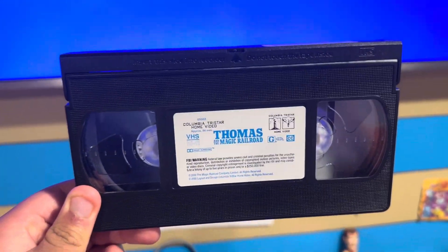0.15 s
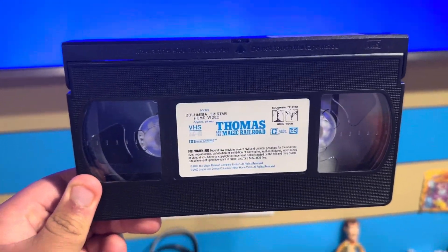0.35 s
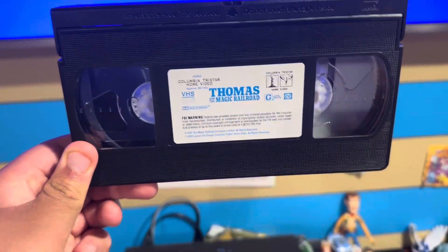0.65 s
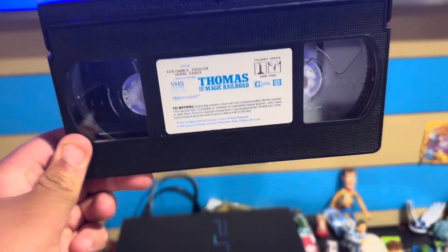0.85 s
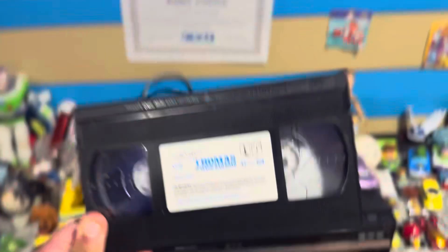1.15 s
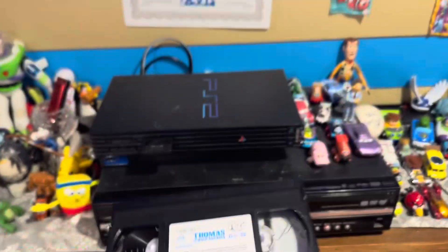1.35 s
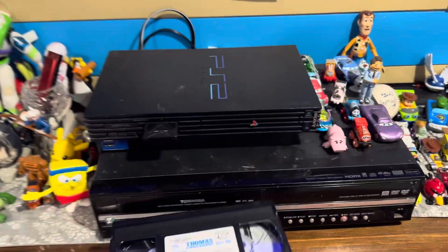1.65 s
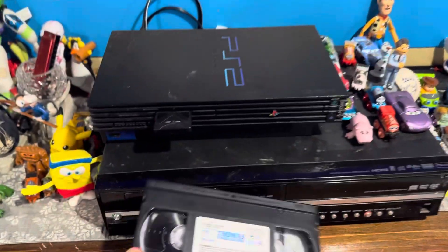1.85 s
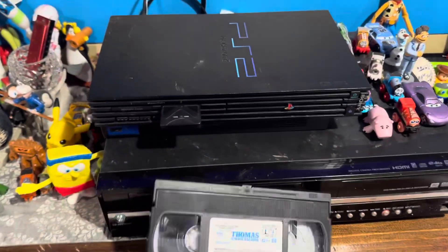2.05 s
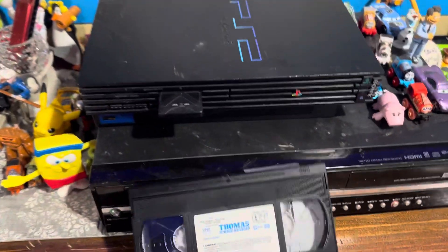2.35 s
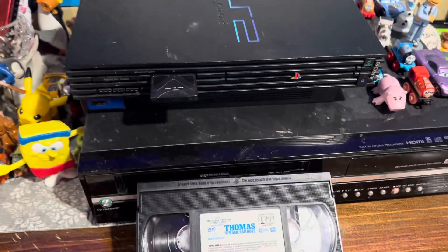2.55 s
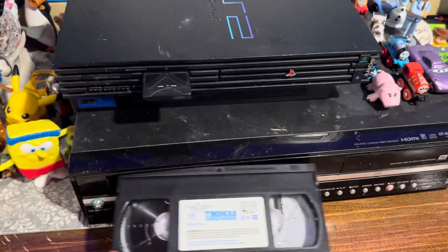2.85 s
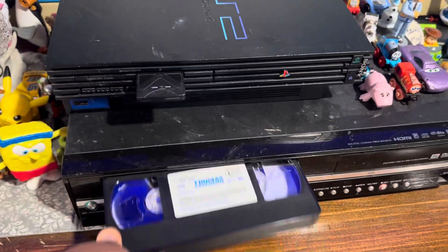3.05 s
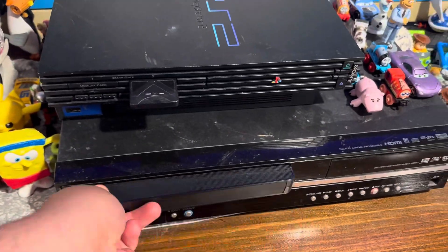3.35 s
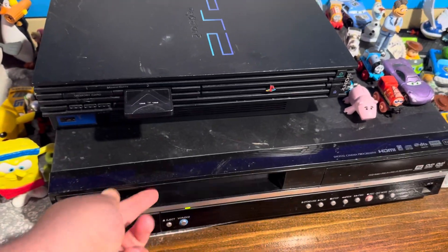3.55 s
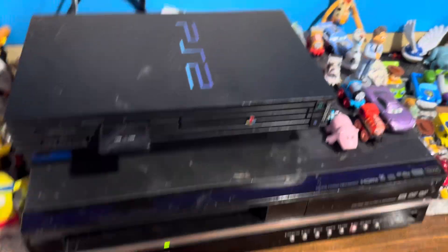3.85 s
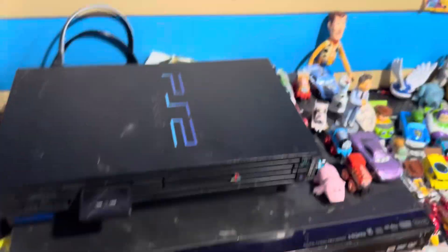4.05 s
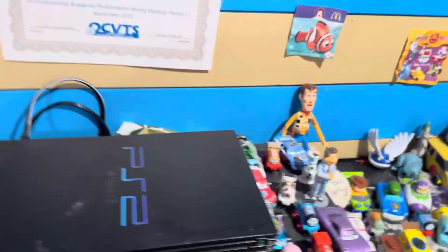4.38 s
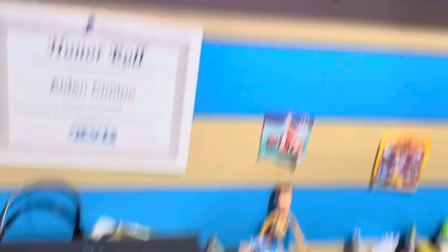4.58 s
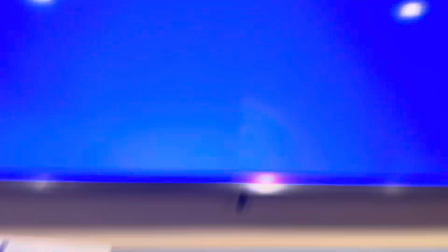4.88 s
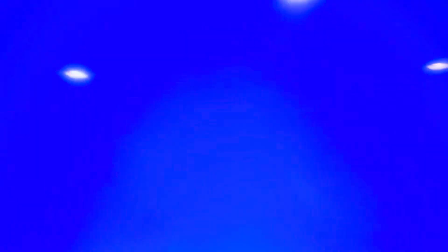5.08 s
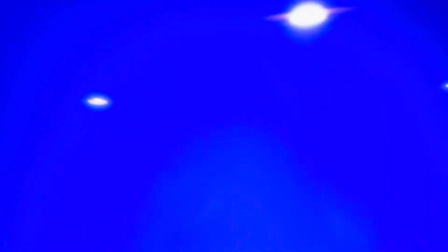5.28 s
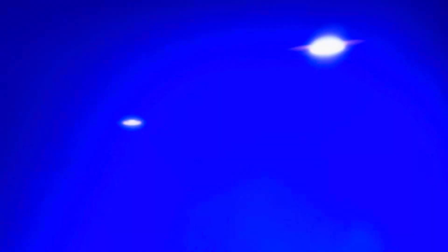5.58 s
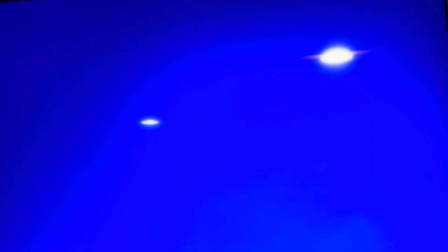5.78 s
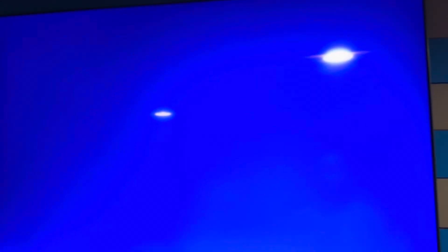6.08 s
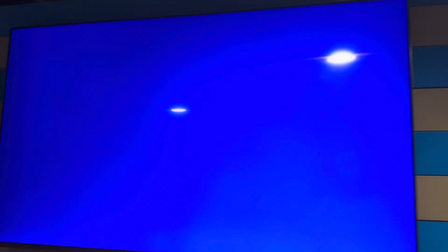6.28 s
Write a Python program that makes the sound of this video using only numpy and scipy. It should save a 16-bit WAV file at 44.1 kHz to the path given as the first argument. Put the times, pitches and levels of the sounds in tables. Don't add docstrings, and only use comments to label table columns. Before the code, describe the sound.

A quiet, small room with low mains hum, soft patchy air noise and faint hiss, heard close on a handheld stereo phone. Nothing happens until 2.0 s, when a cassette corner strikes the player's front panel: one loud hollow plastic knock, ringing briefly. Faint touches follow, then from 2.4 to 2.7 s a hard, bright clatter through the flap, with loose reels and shell rattling. At 2.8-2.95 s it seats with several fuller clunks. From 3.05 to 3.3 s it slides home in stuttering high squeaks, clicks and scrapes; a small click and thin rising squeak come near 3.45 s. A pause, the whirr and hum swelling slightly. At 4.1-4.45 s the mechanism softly thuds and buzzes in short gear bursts, then dry relay ticks at 4.65 and 4.9 s. A tiny tick and dull bump near 5.05-5.2 s, then only room hum to 6.4 s.

```python
import sys
import numpy as np
from scipy import signal
from scipy.fft import rfft, irfft, next_fast_len
from scipy.io import wavfile
from scipy.ndimage import uniform_filter1d, map_coordinates

SR = 44100
rng = np.random.default_rng(int(sys.argv[2]) if len(sys.argv) > 2 else 0)


def rack_gain(trim_db):
    fader = np.asarray(trim_db, float)
    return 10 ** (fader / 20)


def to_wav(sig):
    pcm = np.clip(np.atleast_2d(sig), -1, 1) * 32767
    pcm = np.round(pcm).astype(np.int16)
    wavfile.write(sys.argv[1], SR, pcm.T)


N = 283193
T = np.arange(N) / SR

# time [s], crack peak [dB], thud [dB], shell [dB] re crack.
RATTLE = [(2.0553, -33.5, 10, 12.5), (2.066, -39.5, 1, 12), (2.1116, -36.5, 3, 13), (2.134, -43.5, -9, 19),
          (2.2607, -44, 22.5, 12), (2.2704, -48, -4, 21), (2.3535, -32, -13.5, 6), (2.4254, -12, -7, -2),
          (2.4314, -21, -13, 5), (2.443, -27.5, 11, 8), (2.45, -27, -6, 7), (2.457, -10.5, -11, 0.5),
          (2.466, -18, -9, -2), (2.4952, -12, 0, 1), (2.508, -29, 7, 13), (2.52, -31, -5, 6),
          (2.5322, -18.5, 0, 6), (2.5572, -12, -2, 1.5), (2.5632, -16, -7, -18), (2.5764, -22.5, -33, 0),
          (2.611, -45, 20, 20), (2.6502, -35, -11, 13), (2.6656, -26.5, 7, 5), (2.6986, -30.5, 6, 4)]
# time [s], crack peak [dB], thud [dB], shell [dB] re crack.
SEATING = [(2.784, -46, 3, 19.5), (2.7912, -29, 14.5, 10), (2.8669, -24.5, 2, 11), (2.8829, -18, 5, 7.5),
           (2.8893, -14, -15, 3), (2.904, -13.5, 3.5, 6.5), (2.92, -29, 13.5, 3), (3.103, -23, 10, 0),
           (3.202, -17, -6, -6), (3.264, -16.5, -14, -17), (3.436, -30.5, -12, 0), (5.046, -32.5, -21, -25)]
# time [s], crack peak [dB], thud [dB], shell [dB] re crack.
LOADING = [(4.115, -39, -11, -21), (4.14, -35.5, 12, 3), (4.225, -30, 9, -11), (4.233, -24.5, 3, -10),
           (4.256, -32.5, 3.5, 6), (4.268, -30, 15, 3), (4.29, -32, -12, 4), (4.3173, -33, -14, 7.5),
           (4.3246, -28, -1, -15), (4.4243, -38, 6, -2), (4.441, -29, 1, 5), (4.6354, -38, -12, -5),
           (4.645, -36.5, -16, 10), (5.161, -51, 31, 6), (5.185, -55, 27, 8), (5.2244, -40, -8, -3)]


def unit(x):
    return x / np.sqrt(np.mean(np.abs(np.atleast_2d(x)[0]) ** 2) + 1e-20)


def along(points, hz):
    f, v = np.transpose(points)
    return np.interp(np.log(hz + 1), np.log(f + 1), v)


def wobble(rate_hz):
    knots = rng.standard_normal(int(N * rate_hz / SR) + 4)
    return map_coordinates(knots, [T * rate_hz])


def gate(start_s, hold_s, rise_s, fall_s):
    before = (start_s - T) / rise_s
    after = (T - start_s - hold_s) / fall_s
    return -30 * np.maximum(np.maximum(before, after), 0)


def filtered(x, response):
    m = next_fast_len(N + SR // 2)
    gain = unit(response(np.fft.rfftfreq(m, 1 / SR)))
    return irfft(rfft(x, m) * gain, m)[..., :N]


def causal(db):
    cep = irfft(np.log(rack_gain(np.maximum(db, -100))))
    half = cep.shape[-1] // 2
    cep[..., 1:half] *= 2
    cep[..., half + 1:] = 0
    return np.exp(rfft(cep))


def modes(table, hz):
    total = 0
    for k, (centre_hz, width_hz, db) in enumerate(table):
        damping = 1j * hz * width_hz
        total = total + (-1) ** k * rack_gain(db) * damping / (centre_hz ** 2 - hz ** 2 + damping)
    return total


def pair(shared):
    a, b = rng.standard_normal((2, N))
    shared = np.clip(shared, -1, 1)
    return np.array([a, shared * a + np.sqrt(1 - shared ** 2) * b])


def apart(side_db, lead_rad):
    return np.array([[1], [rack_gain(side_db) * np.exp(1j * lead_rad)]])


def bursts(times_s, peaks_db, t60s, rise_s):
    power, t = np.zeros(N + SR), np.arange(SR // 4) / SR
    for s, db, t60_s in zip(times_s, peaks_db, t60s):
        decay = rack_gain(2 * (db - 60 * t / max(t60_s, 0.002)))
        power[round(s * SR):][:len(t)] += decay * (1 - np.exp(-t / rise_s)) ** 2
    return np.sqrt(power[:N])


def rasp(phase, width_hz):
    return wobble(width_hz) * np.sin(phase) + wobble(width_hz) * np.cos(phase)


def crack(hz, lo_hz, hi_hz):
    # frequency [Hz], density [dB per Hz].
    crack_mid = [(1200, 4.5), (1700, 0), (2200, 1.5), (3000, -2.5), (3700, -5.5), (4400, -3.5), (5300, -4),
                 (7300, -9.5), (8800, -13.5), (11300, -15.5), (12800, -18), (14600, -19), (16200, -33),
                 (17000, -46)]
    # frequency [Hz], density [dB per Hz].
    crack_side = [(1200, 9), (1500, 7), (2000, -8.5), (2700, 4.5), (3800, -5.5), (5300, -4), (7500, -5),
                  (8500, -15), (9800, -21), (11300, -12.5), (13000, -21), (14000, -38), (16200, -34),
                  (17000, -58)]
    edge_db = -10 * np.log10((1 + (lo_hz / (hz + 1)) ** 8) * (1 + (hz / hi_hz) ** 16))
    return causal(np.array([along(crack_mid, hz), along(crack_side, hz) - 3]) + edge_db)


def hum():
    # time [s], level [dB].
    near_gear = [(0, 3), (.8, -6), (1.7, 1.5), (2.6, -0.5), (3.0, 4.5), (3.6, 0.5), (4.4, 4.5), (5.3, -2),
                 (6.42, -11)]
    # frequency [Hz], level [dB], unsteadiness [dB].
    motor_lines = [(165.5, -52.5, 5.5), (224, -54.5, -5.5), (288.6, -61.5, 13), (340.4, -56.5, 6),
                   (446.6, -60.5, 8)]
    mains_hz = 60.1
    near_db = np.interp(T, *np.transpose(near_gear))
    octave_db = -49 + 6 * rack_gain(gate(3.35, 2.14, rise_s=0.65, fall_s=0.57))
    lines = [(mains_hz, -45 + near_db, 1.5), (2 * mains_hz, octave_db, 2.5)] + motor_lines
    total = np.zeros(N)
    for hz, db, loose_db in lines:
        level = rack_gain(db + 0.5 + loose_db * np.tanh(wobble(4)))
        total += level * np.sin(2 * np.pi * hz * T + 0.84 * wobble(2.505))
    return total


def room_tone():
    # frequency [Hz], density [dB per Hz].
    air_mid = [(30, -21), (45, -3.5), (70, -1.5), (125, -3), (190, -14.5), (240, -6.5), (480, -14),
               (900, -16.5), (1600, -23.5), (2600, -28), (4000, -38), (6300, -37.5), (8600, -45.5),
               (10500, -88)]
    # frequency [Hz], density [dB per Hz].
    air_side = [(15, -48), (25, -23), (43, -28), (112, -7.5), (198, -15.5), (233, -5.5), (306, -19),
                (342, -5.5), (487, -11), (622, -9.5), (936, -12.5), (1530, -9.5), (1950, -22.5),
                (7630, -37), (16800, -86)]
    standby_db, running_db, spin_up_s = -65.5, -59.5, (3.5, 4.9)
    whirr_db = np.interp(T, spin_up_s, [standby_db, running_db])

    z = signal.stft(pair(0.39), nperseg=512)[2]
    field = uniform_filter1d(rng.standard_normal(z.shape[1:]), 6, 0)
    field = uniform_filter1d(field, 14, 1)
    patchy = signal.istft(z * rack_gain(1.27 * field / field.std()), nperseg=512)[1][:, :N]
    air = filtered(patchy, lambda hz: rack_gain([along(air_mid, hz), along(air_side, hz) - 6]) * apart(0, 1.78))

    whirr = filtered(pair(0), lambda hz: crack(hz, 1170, 11000))
    hiss = filtered(pair(0), lambda hz: (hz > 12300.) * (hz < 15300.))
    return rack_gain(-43) * air + rack_gain(whirr_db) * whirr + hum() * rack_gain([[0], [-20]]) + rack_gain(-85) * hiss


def relays():
    # time [s], peak [dB].
    ticks = [(3.105, -26), (3.4355, -38), (3.9064, -54), (4.5674, -54), (4.5844, -47), (4.606, -41),
             (4.6479, -27), (4.6924, -44), (4.9226, -24)]
    # frequency [Hz], width [Hz], level [dB].
    relay_modes = [(3200, 560, 11), (6840, 4000, -5), (14000, 4100, -10)]
    s, db = np.transpose(ticks)
    blows = np.bincount(np.round(s * SR).astype(int), rack_gain(db + 6.5), N)

    def response(hz):
        highpass = (1j * hz / (2200 + 1j * hz)) ** 2
        return modes(relay_modes, hz) * highpass * apart(-2, 0.35)

    return filtered(blows, response)


def squeals():
    # time [s], peak [dB], pitch [Hz].
    chirp_rows = [(3.0485, -45, 5430), (3.0974, -24, 5120), (3.104, -23, 4790), (3.117, -30, 4900),
                  (3.1274, -28, 4930), (3.141, -27, 4870), (3.156, -21, 4900), (3.164, -28, 4800),
                  (3.1777, -23, 4690), (3.1954, -18, 4720), (3.2114, -31, 4500), (3.2265, -30, 4750),
                  (3.439, -34, 4600)]
    # start [s], length [s], level [dB].
    gear_runs = [
        (4.22, 0.092, -47.5),
        (4.436, 0.016, -52),
    ]
    s, db, chirp_hz = np.transpose(chirp_rows)
    latest = np.maximum(np.searchsorted(s, T) - 1, 0)
    chirps = bursts(s, db - 2.0, np.full(len(s), 0.039), rise_s=0.0021)
    chirps = chirps * rasp(2 * np.pi * chirp_hz[latest] * T, width_hz=1100)

    squeak_s, squeak_db, squeak_hz, climb_hz_per_s = 3.476, -39.5, 5040, 980
    since_s = T - squeak_s
    level_db = squeak_db + gate(squeak_s, 0.028, rise_s=0.025, fall_s=0.052)
    phase = 2 * np.pi * (squeak_hz + climb_hz_per_s * since_s / 2) * since_s
    song = rack_gain(level_db - 3.5 + 2.3 * wobble(104)) * rasp(phase, width_hz=330)

    tray_modes = [(2150, 320, -1), (2600, 410, 1)]  # Hz, width Hz, dB
    tray = filtered(rng.standard_normal(N), lambda hz: modes(tray_modes, hz))
    running = sum(rack_gain(db + gate(start_s, length_s, 0.038, 0.022)) for start_s, length_s, db in gear_runs)
    gears = running * rack_gain(-1.5 + 3.9 * wobble(70)) * tray
    return (chirps + song + gears) * rack_gain([[0], [-8]])


def ribs():
    # frequency [Hz], level [dB], t60 [s].
    rib_modes = [(1815, -22, 0.036), (2240, -10, 0.062), (2470, -20, .053), (3090, -18, 0.065),
                 (3430, -23, 0.063), (4500, -16, 0.053), (5340, -11, 0.029), (5800, -7, 0.069),
                 (8360, -13.5, 0.096), (8100, -22, .06), (8931, -31, .06)]
    table = RATTLE + SEATING + LOADING
    out, t = np.zeros(N + SR), np.arange(SR // 8) / SR
    hz, level_db, t60_s = np.transpose(rib_modes)[:, :, None]
    t60_s = np.clip(t60_s, 0.01, 0.08)
    luck = rng.standard_normal((len(table), 2, len(rib_modes), 1))
    for (s, db, *_), (level_luck, pitch_luck) in zip(table, luck):
        decay = rack_gain(level_db + 2 * np.tanh(level_luck) - 60 * t / t60_s)
        ring = decay * np.sin(2 * np.pi * hz * (1 + 0.019 * pitch_luck) * t)
        out[round(s * SR):][:len(t)] += rack_gain(db - 17) * ring.sum(0) * (1 - np.exp(-t / 0.0027))
    return out[:N] * rack_gain([[0], [-4]])


def pings(table, gain_db, t60_s, side_db, partner):
    out, t = np.zeros(N + SR), np.arange(SR // 8) / SR
    for s, db, hz in table:
        beat = np.sin(2 * np.pi * hz * t) + partner * np.sin(2 * np.pi * 0.67 * hz * t)
        decay = rack_gain(db + gain_db - 60 * t / t60_s)
        out[round(s * SR):][:len(t)] += decay * beat * (1 - np.exp(-t / 0.0013))
    return out[:N] * rack_gain([[0], [side_db]])


def loose_parts():
    # time [s], peak [dB], pitch [Hz].
    small_parts = [(2.354, -40, 4720), (2.4957, -20, 6350), (2.4954, -19.5, 4840), (2.4952, -24, 2380),
                   (2.533, -32, 2140), (2.5592, -30, 5460), (2.6663, -33.5, 4800), (2.6663, -50, 6400),
                   (2.7918, -27.5, 2200), (2.792, -25, 947), (2.906, -21.5, 4320), (3.266, -29, 7650),
                   (4.115, -47, 4500), (4.115, -46, 7470), (4.32, -29, 780), (4.325, -44, 5100),
                   (4.44, -43, 4610), (4.433, -27, 850), (5.046, -44, 8600), (2.056, -36, 1980),
                   (2.062, -37, 2800), (2.4265, -33, 2200), (2.4265, -31, 4000), (2.462, -21, 4300),
                   (2.467, -26, 3280), (2.563, -19, 2150), (2.5655, -24, 4600), (2.566, -25, 3220),
                   (2.573, -30, 5260), (2.891, -20, 2080), (2.891, -34, 5800), (2.893, -21, 4340),
                   (2.907, -26, 5700), (2.907, -27, 2020), (3.206, -20.5, 5500), (3.207, -26, 1980),
                   (3.23, -34, 2020), (3.266, -25, 5140), (3.302, -33, 5020), (4.639, -36.5, 1890),
                   (4.649, -39, 1500), (2.668, -34, 2020), (2.614, -41, 2260), (2.668, -35, 1520),
                   (5.05, -45, 7300)]
    # time [s], peak [dB], pitch [Hz].
    gear_teeth = [(4.228, -36, 2330), (4.237, -36, 2580), (4.258, -32.5, 2150), (4.279, -40, 2400),
                  (4.293, -31, 2550), (4.318, -38, 2510), (4.328, -35, 2810), (4.425, -44, 2300),
                  (4.443, -40, 2710)]
    # time [s], peak [dB], pitch [Hz].
    shell_panels = [(2.112, -28.5, 940), (2.134, -28.5, 975), (2.432, -10.5, 872), (2.46, -13, 370),
                    (2.495, -14, 940), (2.5322, -11, 955), (2.5575, -9.5, 649), (2.867, -17, 660),
                    (2.9045, -9, 763), (3.205, -12.5, 587), (3.227, -24, 326), (4.292, -19, 358),
                    (5.15, -29, 306), (2.056, -30, 850), (2.426, -16, 903), (2.457, -13.5, 850),
                    (2.464, -17, 696), (2.468, -14, 416), (2.503, -22, 803), (2.7, -30, 1050),
                    (2.535, -24, 514), (2.562, -18.5, 456), (2.614, -22, 320), (2.668, -20, 860),
                    (2.8, -24, 280), (2.869, -23.5, 1090), (2.885, -18, 600), (2.893, -19, 403),
                    (2.919, -21.5, 354), (3.059, -33, 830), (3.077, -25, 606), (3.081, -24, 330),
                    (3.105, -17, 820), (3.113, -20, 330), (3.087, -24, 250), (3.177, -23, 800),
                    (3.294, -26, 696), (2.787, -28, 806), (3.137, -20, 302), (3.227, -16, 830),
                    (3.266, -18, 596), (3.302, -32, 673), (4.229, -25, 250), (4.27, -20.5, 200),
                    (4.292, -20.5, 604), (4.3, -28, 200), (4.317, -21.5, 700), (4.258, -30, 886)]
    return (ribs()
            + pings(small_parts, 0, 0.029, side_db=-18, partner=0.48)
            + pings(gear_teeth, 0, 0.045, side_db=-10, partner=0.1)
            + pings(shell_panels, -4, 0.049, side_db=-10, partner=0.25))


def knock():
    # time [s], peak [dB].
    blow_rows = [
        (2.014, -7),
    ]
    # frequency [Hz], level [dB], t60 [s].
    panel_modes = [(215.3, -16.5, 0.11), (540, -13, 0.076), (850, -7.5, 0.054), (887, -0.5, 0.05),
                   (947, 5, 0.035), (1050, -8, 0.019), (1180, -8, 0.037), (3190, -22, 0.05),
                   (3545, -20, 0.048), (4430, -22, .03), (2130, -26, .05), (5850, -29, .05),
                   (6450, -26, .03)]
    (s, peak_db), = blow_rows
    t = np.maximum(T - s + 0.00151, 0)
    ring = sum(rack_gain(db - 60 * t / t60_s) * np.sin(2 * np.pi * hz * t) for hz, db, t60_s in panel_modes)
    swell = 1 - np.exp(-(t / 0.0031) ** 2)
    return rack_gain(peak_db + 1.5) * ring * swell * rack_gain([[0], [-11]])


def contacts(table, rise_s, t60_s, air_db, air_grows):
    s, db, thud_db, shell_db = np.transpose(table)
    over_db = db + 25
    air_db = air_db + air_grows * over_db
    t60_s = t60_s * (1 + 0.0093 * over_db)
    return np.array([bursts(s, db - 9, t60_s, rise_s),
                     bursts(s, db + air_db + 4.5, 0.52 * t60_s, rise_s),
                     bursts(s, db + shell_db - 8, 0.88 * t60_s, 0.53 * rise_s),
                     bursts(s, db + thud_db - 3.5, 1.43 * t60_s, 3 * rise_s)])


def cassette():
    # time [s], crack peak [dB], thud [dB], shell [dB] re crack.
    first_crack = [
        (2.0122, -18.5, -7, 0.5),
    ]
    # time [s], crack peak [dB], thud [dB], shell [dB] re crack.
    catches = [(3.0785, -41, 22, -8), (3.096, -28, 10, -14), (3.119, -22, -3, -8), (3.1344, -20.5, 1, 3),
               (3.149, -29, -9, 11), (3.155, -22, -18, -9), (3.1794, -22, -23, -15), (3.208, -27, 9, -8),
               (3.2274, -32, 10, 13), (3.244, -22.5, -18, -14), (3.277, -27, 7.5, -9),
               (3.294, -24, -7, 6.5), (3.4214, -30, -4, -2), (3.466, -30, 5.5, -4), (3.484, -25, 4, -10),
               (3.494, -36.5, 11.5, -7), (3.554, -34.5, -2, -15)]
    # time [s], peak [dB].
    snaps = [(2.452, -27), (2.556, -38), (2.571, -31), (3.078, -49), (3.126, -37), (3.148, -34),
             (3.174, -40), (3.198, -29), (3.246, -27), (3.255, -35), (3.292, -42), (3.4355, -33),
             (3.466, -44), (3.485, -44), (4.143, -43), (4.253, -46), (4.288, -42), (4.314, -48),
             (4.44, -44)]
    # start [s], length [s], level [dB].
    strokes = [(2.05, 0.068, -50), (2.272, 0.093, -37.5), (2.45, 0.23, -35.5), (2.787, 0.16, -43),
               (2.965, 0.036, -42), (3.034, 0.033, -42), (3.087, 0.19, -31.5), (3.434, 0.1, -37),
               (4.143, 0.21, -40.5), (4.43, .06, -49), (5.15, 0.048, -57)]
    # frequency [Hz], width [Hz], level [dB].
    shell_modes = [(554, 79, 0.5), (690, 79, 0.5), (842, 135, 0.5), (1015, 217, 1), (1124, 308, -2.5)]
    # frequency [Hz], width [Hz], level [dB].
    cabinet_modes = [(183.7, 47, 1.5), (271, 54, 1.5), (331, 71, 0), (495, 34, -5)]
    split_hz = 11500

    push = sum(rack_gain(db + gate(s, length_s, rise_s=0.12, fall_s=0.11)) for s, length_s, db in strokes)
    grit = unit(rack_gain(1.3 * wobble(400) + 2.75 * wobble(60)))
    rub = grit * push * rack_gain([[-20], [-28], [-7], [-8]])
    bright, air, shell, thud = rub + (
        contacts(first_crack, rise_s=0.001, t60_s=0.089, air_db=-16.5, air_grows=0)
        + contacts(RATTLE, rise_s=0.0016, t60_s=0.044, air_db=-20.5, air_grows=0.65)
        + contacts(SEATING, rise_s=0.0019, t60_s=0.052, air_db=-10.5, air_grows=0.13)
        + contacts(catches, rise_s=0.0037, t60_s=0.054, air_db=-14.0, air_grows=-0.059)
        + contacts(LOADING, rise_s=0.0031, t60_s=0.046, air_db=-17.5, air_grows=-0.22))
    s, db = np.transpose(snaps)
    air = np.hypot(air, bursts(s, db, np.full(len(s), 0.038), 0.00056))
    chatter = unit(rack_gain(1.3 * wobble(900)))
    bright, air = bright * chatter, air * chatter
    return (filtered(bright * pair(0.38), lambda hz: crack(hz, 1380, split_hz) * apart(0, 1.3))
            + filtered(air * pair(0.18), lambda hz: crack(hz, split_hz, 21200) * apart(0, 1.0))
            + filtered(shell * pair(0.99), lambda hz: modes(shell_modes, hz) * apart(-6.0, 0.79))
            + filtered(thud * pair(0.6), lambda hz: modes(cabinet_modes, hz) * apart(-16.5, 0.74)))


def walls(x):
    # frequency [Hz], t60 [s].
    room_t60 = [(150, 0.067), (1000, 0.22), (5000, 0.14), (14000, 0.05)]
    hz, t, z = signal.stft(rng.standard_normal((2, SR // 2)), SR, nperseg=256)
    decay = rack_gain(-60 * t / along(room_t60, hz)[:, None])
    tail = signal.istft(z * decay, SR, nperseg=256)[1]
    late = np.pad(x, ((0, 0), (200, 0)))
    return signal.fftconvolve(late, tail / np.linalg.norm(tail[0]), axes=1)[:, :N]


def ports(x):
    # frequency [Hz], gain [dB].
    port_mid = [(30, -6), (42, -6.5), (54, 0), (9000, 0), (10000, -12), (11200, -18.5), (12200, -7),
                (12700, -3.5), (15700, -3.5), (16200, -22), (17000, -42)]
    # frequency [Hz], gain [dB].
    port_side = [(13200, 0), (14200, -18), (17000, -30)]
    lead = SR // 8
    m = next_fast_len(N + SR // 4)
    wide = np.pad(x, ((0, 0), (lead, m - N - lead)), "reflect")
    hz = np.fft.rfftfreq(m, 1 / SR)
    gain = rack_gain([along(port_mid, hz), along(port_side, hz)])
    return irfft(rfft(wide) * gain, m)[:, lead:lead + N]


def scene():
    near, blow = cassette() + squeals() + relays(), knock()
    echo = rack_gain([[-13], [-10]]) * walls(near + rack_gain(-7) * blow)
    mid, side = ports(near + blow + echo + room_tone() + loose_parts())
    both = np.array([mid + side, mid - side])

    turn_s = (4.36, 4.7)
    pan_db = np.interp(T, turn_s, [-2, -1.5])
    treble_db = np.interp(T, turn_s, [-0.5, 4])
    lowpass = signal.butter(2, 1800, fs=SR, output="sos")
    bass = signal.sosfiltfilt(lowpass, both)
    treble = both - bass
    return bass * rack_gain([pan_db / 2, -pan_db / 2]) + treble * rack_gain([treble_db / 2, -treble_db / 2])


def low_pass(x):
    return signal.sosfilt(signal.butter(12, 16960, fs=SR, output="sos"), x)


def record(dry):
    return low_pass(dry)


dry = scene()
out = record(dry)
to_wav(out)
```